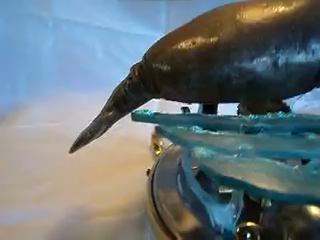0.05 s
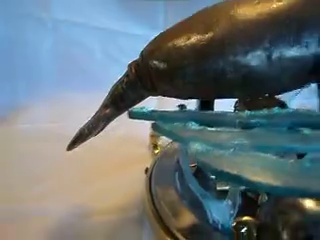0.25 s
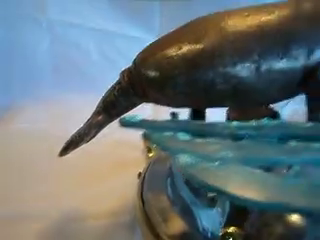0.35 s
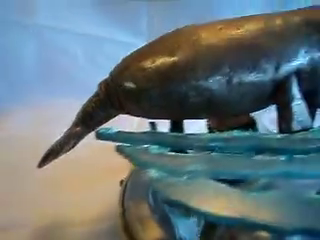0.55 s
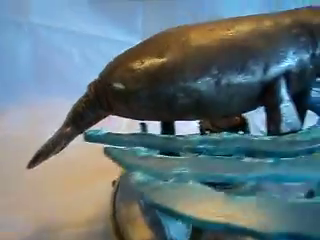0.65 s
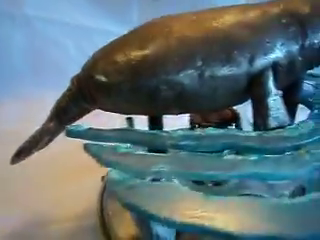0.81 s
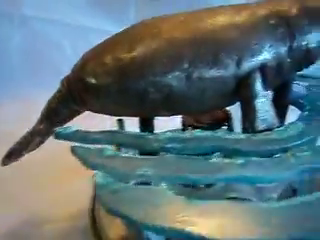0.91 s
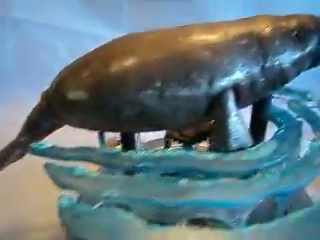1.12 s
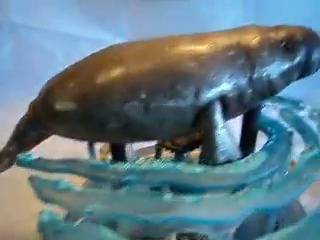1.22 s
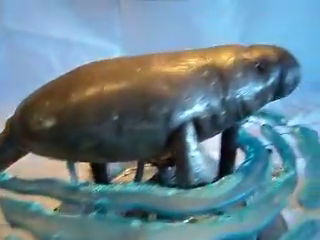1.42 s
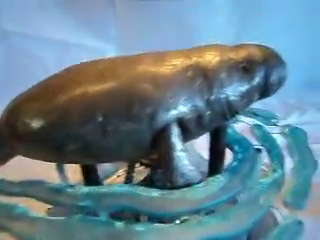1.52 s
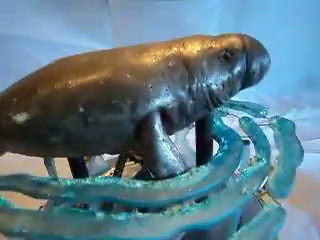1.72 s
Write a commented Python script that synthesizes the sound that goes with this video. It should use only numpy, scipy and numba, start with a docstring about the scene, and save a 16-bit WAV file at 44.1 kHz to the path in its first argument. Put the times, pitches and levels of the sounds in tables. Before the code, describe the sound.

Handling clicks on a small camera, close and dry: a hard snap, a clack that drags into a short scrape, a tiny squeak, then two softer clacks. Steady hiss fills the quiet room.

```python
"""Handling clicks on a small camera, close and dry, as it is carried round a metal sculpture in a quiet room.
Impacts and friction excite the damped modes of one casing: a hard snap, a clack that drags into a
short scrape and, after a tiny rubbing squeak, two softer clacks. The snap overloads the recorder:
its gain ducks, and the room hiss creeps back over the next second."""
import sys
import numpy as np
from scipy import signal
from scipy.fft import rfft, irfft
from scipy.io import wavfile
from numba import njit

SR = 44100
rng = np.random.default_rng(int(sys.argv[2]) if len(sys.argv) > 2 else 0)


def wav_record(signal):
    """Record a signal, one row per channel, as 16-bit PCM in the file named by sys.argv[1]."""
    frames = np.transpose(np.atleast_2d(signal))
    bounded = np.clip(frames, -1, 1)
    # unit amplitude maps onto the largest positive 16-bit level
    quanta = np.round(bounded * 32767).astype(np.int16)
    wavfile.write(sys.argv[1], SR, quanta)


N = 77175

# Spectrum of the room's air noise: f/Hz, relative level/dB
HISS_SPECTRUM = [(25, -9), (60, -3), (100, 0), (140, -4.5), (240, -2.5), (360, -6), (540, -6), (800, -11),
                 (1500, -14), (2600, -18), (4200, -19.5), (5300, -22.5)]
# Impacts on the casing: t/s, level/dB, thud f/Hz, thud level/dB, knock f/Hz, treble level/dB,
# knock T60/s, ring level/dB, room level/dB
IMPACTS = [(0.2065, 1.5, 800, -21, 1985, 2.5, 0.0057, -2, -11.5),
           (0.2763, -3, 458, -22, 1965, -1, 0.012, 1, -9.5),
           (0.8205, -10, 840, -13, 2160, -18, 0.011, 2, -8),
           (0.8755, -15, 830, -10, 1950, -10, .013, -13, -5.5)]
# Bright, heavily damped resonances of the contact: f/Hz, level/dB, T60/s
CRACK_MODES = [(3765, 1, 0.006), (3940, -1, 0.0027), (4550, -2.5, 0.0065)]
# Normal modes of the casing: f/Hz, level/dB, T60/s
CASING_MODES = [(490, -20.5, 0.03), (634, -27.5, 0.057), (795, -22, .03), (877, -22.5, 0.031),
                (1290, -28, .035), (1850, -19, 0.028), (2100, -20.5, 0.012), (2210, -19, 0.023),
                (2393, -29, 0.036), (2920, -25.5, 0.03), (3687, -19, 0.026), (3560, -32.5, 0.013),
                (4680, -24, .03)]
# Spectrum of the room's reflections: f/Hz, level/dB
ROOM_SPECTRUM = [(150, -10.5), (450, -1.5), (850, 10), (1400, 4.5), (2200, -6), (4500, -16.5)]
# Stretches of rubbing: start t/s, end t/s, level/dB, thud level/dB, treble level/dB
RUBBING = [(0.21, 0.223, -37.5, -9, -7.5), (0.271, 0.316, -26, -8, -13), (0.842, 0.918, -51.5, -1.5, -15)]
# Small slips and rattles after the impacts: t/s, level/dB, treble level/dB
SLIPS = [(0.2243, -29, -6), (0.2335, -24.5, -10), (0.2853, -23, -4), (0.2914, -19, -11),
         (0.2971, -20.5, -2), (0.3, -20, -6.5), (0.3084, -24, 0), (0.3161, -23.5, -3), (0.3182, -30, 1),
         (0.8536, -31.5, -17), (0.9105, -36.5, -12)]


def undb(db):
    """Logarithmic level: 20 dB is a factor of ten in amplitude."""
    return 10 ** (np.asarray(db) / 20)


def colour(x, points, size=8192):
    """Minimum-phase filtering through points of f/Hz, level/dB."""
    hz, db = np.array(points, float).T
    freq = np.maximum(np.arange(size // 2 + 1) * SR / size, 1)
    gain = undb(np.interp(np.log(freq), np.log(hz), db))
    cepstrum = irfft(np.log(gain))
    cepstrum[1:size // 2] *= 2  # folding onto positive time makes the filter causal
    cepstrum[size // 2 + 1:] = 0
    return signal.fftconvolve(x, irfft(np.exp(rfft(cepstrum))))[:N]


def hiss(level_db=-50.5):
    """Stationary random noise: the air of the room, strongest in the bass."""
    air = colour(rng.standard_normal(N), HISS_SPECTRUM)
    return undb(level_db) * air / air.std()


def impulse(at, db):
    """A hard contact acts as an impulse of force, equally strong at all frequencies."""
    return undb(db) * (np.arange(N) == int(at * SR))


def ring(force, modes):
    """Modal superposition: a force drives damped sinusoids, successive ones opposite in sign."""
    t = np.arange(SR // 8) / SR
    response = sum((-1) ** k * undb(db) * np.sin(2 * np.pi * hz * t) * 1000 ** (-t / t60)
                   for k, (hz, db, t60) in enumerate(modes))
    return signal.fftconvolve(force, response)[:N]


def casing(force, thud_hz, thud_db, knock_hz, knock_t60, treble_db, ring_db):
    """Resonance: a thud and knock set by the place of contact, a bright crack and the casing's ring."""
    contact_modes = [(thud_hz, thud_db, 0.021), (knock_hz, -3, knock_t60)] + CRACK_MODES
    body = ring(force, contact_modes) + undb(ring_db) * ring(force, CASING_MODES)
    return colour(body, [(2550, 0), (3430, treble_db)])  # a softer contact dulls the treble


def room(x, t60_s=0.087, build_s=0.0021, gain_db=-8.5):
    """Reverberation: diffuse reflections build up quickly and decay exponentially."""
    t = np.arange(SR // 3) / SR
    tail = rng.standard_normal(len(t)) * 1000 ** (-t / t60_s) * (1 - np.exp(-t / build_s))
    reflections = signal.fftconvolve(x, tail / np.linalg.norm(tail))[:N]
    return undb(gain_db) * colour(reflections, ROOM_SPECTRUM)


def lag(x, seconds):
    """First-order relaxation smooths a signal with the given time constant."""
    keep = np.exp(-1 / (seconds * SR))
    return signal.lfilter([1 - keep], [1, -keep], x)


@njit
def duck(x, threshold, depth_db, hold_s, recover_db_per_s):
    """Feedback control: overload sets the full attenuation in dB, which holds, then falls steadily."""
    cut_db, cut, wait = np.zeros(len(x)), 0., 0.
    for i in range(len(x)):
        if abs(x[i]) * 10 ** (-cut / 20) > threshold:
            cut, wait = depth_db, hold_s
        wait -= 1 / SR
        if wait < 0:
            cut = max(cut - recover_db_per_s / SR, 0.)
        cut_db[i] = cut
    return cut_db


def gain_control(x, depth_db=12.5, attack_s=0.0008, offset_decay_s=0.45):
    """Automatic gain control: overload ducks the gain and shifts the zero line during the hold."""
    cut_db = duck(x, threshold=0.5, depth_db=depth_db, hold_s=0.2185, recover_db_per_s=15.5)
    offset = 0.011 * (cut_db >= depth_db)  # drops back with a soft pop
    return x * undb(-lag(cut_db, attack_s)) + offset - lag(offset, offset_decay_s)


def scrape(t, grains_per_s=1500):
    """Sliding friction: dense random impulses and a few distinct slips drive the casing."""
    grains = rng.standard_normal(N) * (rng.random(N) < grains_per_s / SR)
    contacts = [(undb(db) * grains * (t > start) * (t < end), thud_db, treble_db)
                for start, end, db, thud_db, treble_db in RUBBING]
    contacts += [(impulse(at, db), -14, treble_db) for at, db, treble_db in SLIPS]
    return sum(casing(force, thud_hz=855, thud_db=thud_db, knock_hz=2054, knock_t60=0.01,
                      treble_db=treble_db, ring_db=5.5) for force, thud_db, treble_db in contacts)


def squeak(t, start_s=0.3656, end_s=0.426, start_hz=2260, sag_hz_per_s=3360, level_db=-47.95):
    """Frictional oscillation: a faint, unsteady tone swells as its pitch sags, then stops abruptly."""
    flutter = lag(lag(rng.standard_normal(N), 0.0008), 0.0008)
    swell = np.interp(t, [start_s, end_s], [0, 1], right=0)
    hz = start_hz - sag_hz_per_s * (t - start_s)
    tone = np.sin(2 * np.pi * np.cumsum(hz) / SR)
    return undb(level_db) * swell * (1 + flutter / flutter.std()) * tone


def scene(friction_room_db=-10):
    """Superposition: close clicks, scrape and squeak add to their reflections and the hiss."""
    t = np.arange(N) / SR
    air = hiss()
    direct = scrape(t) + squeak(t)
    to_room = undb(friction_room_db) * direct
    for at, db, thud_hz, thud_db, knock_hz, treble_db, knock_t60, ring_db, room_db in IMPACTS:
        click = casing(impulse(at, db), thud_hz, thud_db, knock_hz, knock_t60, treble_db, ring_db)
        direct += click
        to_room += undb(room_db) * click
    return (direct + room(to_room) + air)[None]


def record(dry, ceiling=0.86):
    """Band limiting and saturation: after gain control, treble is cut and the highest peaks clip."""
    slope = signal.butter(6, 5002, fs=SR, output="sos")
    band_edge = signal.cheby1(10, 0.3, 5595, fs=SR, output="sos")
    top_cut = signal.ellip(8, 0.2, 70, 17000, fs=SR, output="sos")
    narrow = signal.sosfilt(np.vstack([slope, band_edge]), gain_control(dry[0]))
    return signal.sosfilt(top_cut, np.clip(narrow, -ceiling, ceiling))[None]


dry = scene()
out = record(dry)
wav_record(out)
```